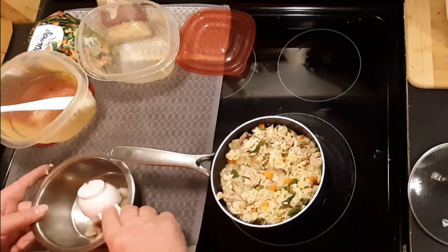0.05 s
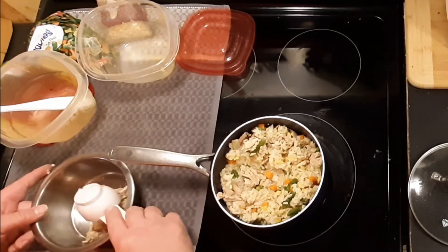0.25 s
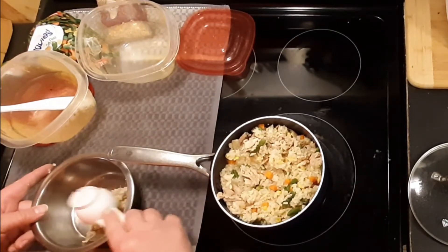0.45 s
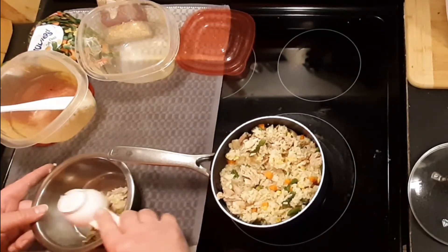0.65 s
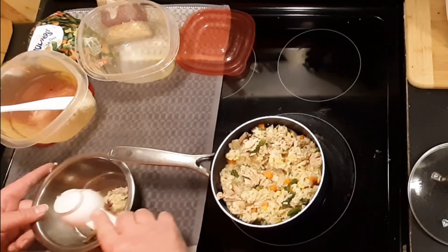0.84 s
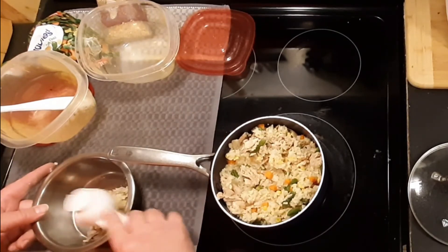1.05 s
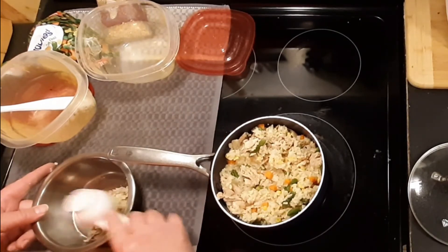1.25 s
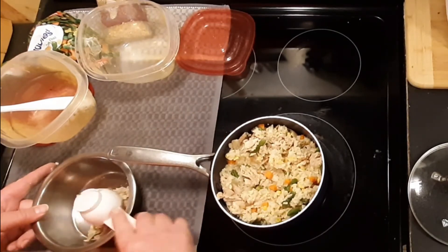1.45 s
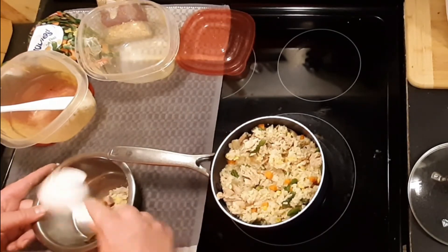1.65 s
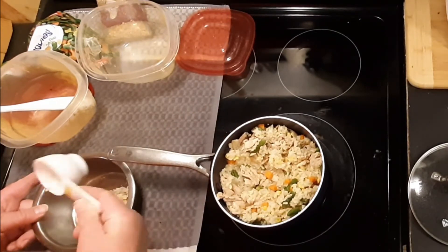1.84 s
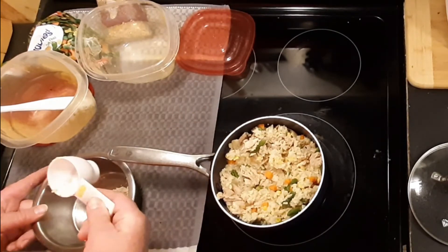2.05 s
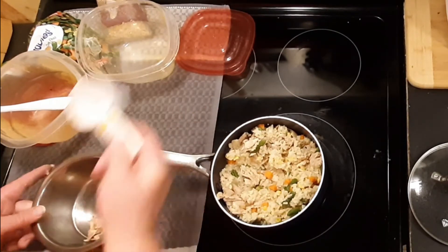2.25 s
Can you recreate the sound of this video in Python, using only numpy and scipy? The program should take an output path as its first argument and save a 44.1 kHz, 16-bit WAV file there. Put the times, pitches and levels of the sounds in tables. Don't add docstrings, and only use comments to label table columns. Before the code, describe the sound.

Close microphone in a small, hard-walled kitchen: nine steady metallic raps of a plastic scoop on a pan, the first soft and the last loudest, faint food patter and low drone between, finally a scraping rub on a plastic tub.

```python
import sys
import numpy as np
from scipy import signal
from scipy.fft import rfft, irfft, next_fast_len
from scipy.io import wavfile
from scipy.ndimage import uniform_filter1d, map_coordinates

SR = 44100
rng = np.random.default_rng(int(sys.argv[2]) if len(sys.argv) > 2 else 0)


def transcribe(signal):
    frames = np.atleast_2d(signal).T
    limited = np.clip(frames, -1, 1)
    pcm = np.round(limited * 32767).astype(np.int16)
    wavfile.write(sys.argv[1], SR, pcm)


def boost(x):
    u = np.asarray(x, float) / 20
    return 10 ** u


N = 101429


def unit(x):
    return x / np.sqrt(np.mean(x ** 2) + 1e-20)


def along(points, hz):
    f, v = np.transpose(points)
    return np.interp(np.log(hz + 1), np.log(f + 1), v)


def curve(rows):
    s, db = np.transpose(rows)
    return boost(np.interp(np.arange(N) / SR, s, db))


def filtered(x, response):
    m = next_fast_len(len(x) + 8192)
    return irfft(rfft(x, m) * response(np.fft.rfftfreq(m, 1 / SR)), m)[:len(x)]


def hiss(spectrum, size):
    return unit(filtered(rng.standard_normal(size), lambda hz: boost(along(spectrum, hz))))


def wobble(rate):
    knots = rng.standard_normal(int(N * rate / SR) + 4)
    return map_coordinates(knots, [np.arange(N) * rate / SR])


def ring(t, hz, db, t60, rise):
    decay = boost(db[:, None] - 60 * t / t60[:, None])
    modes = decay * np.sin(2 * np.pi * hz[:, None] * t)
    return modes.sum(0) * (1 - np.exp(-(t / rise) ** 2))


def add(track, x, s):
    part = track[max(round(s * SR), 0):][:len(x)]
    part += x[:len(part)]


# start_s, level_db, pitch_hz (cup note), rim_level_db, note_level_db
TAPS = [
    (0.0582, -17, 833, -14, -5),
    (0.2186, -5, 952, -8, -2.5),
    (0.3886, -5, 878, -8, 3),
    (0.5543, -2.5, 812, -6.5, 0.9),
    (0.729, -4.5, 850, -3, 2.7),
    (0.9122, -2.2, 884, -4, 1.6),
    (1.0854, -0.47, 982, -9, 3.1),
    (1.2770, -3.5, 850, -5.5, 3.5),
    (1.4517, 0.7, 908, -10, 1.84),
]
# frequency_hz, level_db (per Hz)
WASH = [(300, -22), (1200, -4), (2600, -11.5), (3500, -16), (5200, 1), (6900, -6.5), (9300, -3),
        (16000, -30)]
WALLS_DB, WALLS_DELAY_S, WASH_DB = -3.5, 0.003, 23
MIC_LOW_HZ = 430


def taps():
    out, t = np.zeros(N), np.arange(SR // 4) / SR
    for s, db, note_hz, rim_db, note_db in TAPS:
        near, far = pan(t, note_hz, rim_db, note_db)
        near = filtered(near, lambda f: (1j * f / (MIC_LOW_HZ + 1j * f)) ** 2)
        direct = near + crack(t, rim_db) + worktop(t)
        wash = boost(WASH_DB + rim_db) * filtered(walls(), lambda hz: boost(along(WASH, hz)))
        echo = boost(WALLS_DB) * signal.fftconvolve(far, walls())
        gain = boost(db - 10)
        add(out, gain * direct, s)
        add(out, gain * wash, s + WALLS_DELAY_S)
        add(out, gain * echo, s + WALLS_DELAY_S)
    return out


# frequency_hz, level_db, t60_s
CUP = [(562.7, -1.5, 0.042), (614, -13, 0.016), (837, -3.5, 0.038), (918, -10, 0.032), (1158, -1.5, 0.016),
       (1347.5, -2, 0.049), (1590, -0.5, 0.063), (1767.6, -1.5, 0.054), (2049, -7.5, 0.048),
       (2264, -12.5, 0.054), (2536, -6.5, 0.034), (2670, -10.5, 0.031)]
# frequency_hz, level_db, t60_s
RIM = [(4320, -8, 0.046), (4660, -6, 0.085), (4770, -5.5, 0.055), (5730, -6.5, 0.099), (6320, -12, .03),
       (7265, -8, 0.09), (8010, 2, 0.056), (8090, -7.5, 0.0067), (8500, 9, 0.011), (9485, -4.5, .03),
       (9635, -5, 0.047), (9970, 2.5, 0.024), (10800, -27, .03), (10840, -14.5, 0.027)]
NOTE_DB, NOTE_T60_S = 6, 0.03
CUP_RISE_S, RIM_RISE_S, RIM_T60_MAX_S = 0.00045, 0.00083, 0.035
SCATTER_DB = 1.2
FAR_SHORTER = 0.38


def pan(t, note_hz, rim_db, note_db):
    cup_hz, cup_db, cup_t60 = np.transpose(CUP)
    rim_hz, rim_mode_db, rim_t60 = np.transpose(RIM)
    cup_db = cup_db + SCATTER_DB * rng.standard_normal(len(cup_hz))
    cup_db = np.append(cup_db, NOTE_DB + note_db)
    cup_hz, cup_t60 = np.append(cup_hz, note_hz), np.append(cup_t60, NOTE_T60_S)
    rim_mode_db = rim_mode_db + rim_db + SCATTER_DB * rng.standard_normal(len(rim_hz))
    rim_t60 = np.minimum(rim_t60, RIM_T60_MAX_S)
    rings = []
    for k in (1, FAR_SHORTER):
        rim = ring(t, rim_hz, rim_mode_db, rim_t60 * k, RIM_RISE_S)
        cup = ring(t, cup_hz, cup_db, cup_t60 * k, CUP_RISE_S)
        rings.append(rim - cup)
    return rings


# frequency_hz, level_db (per Hz)
CRACK = [(300, -41.5), (2500, -10.5), (3500, -14.5), (5500, 5.5), (7000, -1), (9000, -1.5), (11500, -9.5),
         (16000, -17.5)]
CRACK_DB, CRACK_T60_S = -1.6, 0.038


def crack(t, rim_db):
    decay = boost(CRACK_DB + rim_db - 60 * t / CRACK_T60_S)
    return decay * hiss(CRACK, size=len(t)) * (1 - np.exp(-t / RIM_RISE_S))


# frequency_hz, level_db, t60_s
WORKTOP = [(165.1, -5.5, 0.07), (187.7, -20.5, 0.26), (257.6, -23, 0.29), (291, -29, .2),
           (356.5, -35, 0.04)]
WORKTOP_RISE_S, WORKTOP_DRIFT = 0.011, 0.03


def worktop(t):
    hz, db, t60 = np.transpose(WORKTOP)
    drift = 1 + WORKTOP_DRIFT * rng.standard_normal(len(hz))
    return ring(t, hz * drift, db, t60, WORKTOP_RISE_S)


# frequency_hz, t60_s
WALLS = [(100, 1), (260, 0.11), (700, 0.36), (1840, 0.37), (4850, 0.35), (9000, 0.26), (14000, 0.24)]
WALLS_RISE_S = 0.0027


def walls():
    hz, t, z = signal.stft(rng.standard_normal(SR // 2), SR, nperseg=256)
    decay = boost(-60 * t / along(WALLS, hz)[:, None])
    tail = signal.istft(z * decay, SR, nperseg=256)[1]
    tail = tail * (1 - np.exp(-np.arange(len(tail)) / SR / WALLS_RISE_S))
    return tail / np.linalg.norm(tail)


# start_s, level_db, t60_s
TINKS = [
    (.1391, -75, 0.018),
    (1.661, -70.5, 0.46),
    (1.692, -70, 0.18),
    (1.937, -84, .25),
]
# frequency_hz, level_db
TINK = [(3310, -10), (6085, 1.5), (6955, 1.5), (7705, -5), (9505, 4), (10510, -11)]


def tinks():
    out, t = np.zeros(N), np.arange(SR // 4) / SR
    hz, level = np.transpose(TINK)
    for s, db, t60 in TINKS:
        noise = rng.standard_normal((len(hz), len(t)))
        shake = signal.hilbert(uniform_filter1d(noise, size=100, axis=1))
        waver = 1 + unit(shake.real) + 1j * unit(shake.imag)
        gains = boost(level + rng.standard_normal(len(hz)))[:, None]
        modes = gains * np.real(waver * np.exp(2j * np.pi * hz[:, None] * t))
        add(out, boost(db - 60 * t / t60) * modes.sum(0), s)
    return out


# start_s, level_db
TICKS = [
    (.1828, -36),
    (.264, -36),
    (1.697, -54),
    (1.715, -57),
]


def ticks():
    out, t = np.zeros(N), np.arange(SR // 4) / SR
    for s, db in TICKS:
        decay = boost(db - 60 * t / 0.003)
        add(out, decay * hiss(CRACK, size=len(t)), s)
    return out


GRAINS_PER_S, GRAIN_SPREAD_DB = 1200, 2.5


def grainy():
    hits = rng.random(N) < GRAINS_PER_S / SR
    sizes = boost(GRAIN_SPREAD_DB * rng.exponential(size=N))
    grains = hits * sizes * rng.standard_normal(N)
    return unit(grains) * 0.6 + rng.standard_normal(N)


# time_s, level_db
SLIDE = [(0, -47.5), (.12, -60), (.14, -48.5), (.21, -54.5), (.255, -50), (.275, -37.5), (.33, -48),
         (.38, -51), (.46, -43), (.54, -49), (.7, -57.5), (1.6, -74.5), (1.72, -66), (1.9, -71.5),
         (2.08, -73.5), (2.16, -67), (2.2, -68.5), (2.3, -66)]
# frequency_hz, level_db (per Hz)
FOOD = [(880, -27), (1500, -8.5), (2230, -4), (2510, -9.5), (4330, -4.5), (7320, -11.5), (11000, -24.5),
        (16000, -42)]


def food():
    sway = boost(1.5 * wobble(30))
    return curve(SLIDE) * sway * unit(filtered(grainy(), lambda hz: boost(along(FOOD, hz))))


# time_s, level_db
BRUSH = [(2.15, -100), (2.22, -72), (2.25, -62), (2.278, -47.5), (2.3, -41)]
# frequency_hz, width_hz, level_db
TUB = [(750, 180, -1.5), (2420, 900, -12), (4200, 1200, -8), (6800, 450, -1.5), (8240, 600, -7.5),
       (10500, 2100, -14.5)]
TUB_WIDTH_MIN_HZ, TUB_TOP_HZ = 500, 11500


def tub_response(f):
    body = 0
    for k, (centre, width, db) in enumerate(TUB):
        width = max(width, min(TUB_WIDTH_MIN_HZ, centre / 3))
        mode = 1j * f * width / (centre * centre - f * f + 1j * f * width)
        body = body + (-1) ** k * boost(db) * mode
    return body / (1 + (f / TUB_TOP_HZ) ** 6)


def brush():
    sway = boost(1.5 * wobble(150))
    return curve(BRUSH) * sway * unit(filtered(grainy(), tub_response))


# time_s, level_db
HUM = [(0, -75), (.06, -43), (.28, -56), (.31, -41), (.5, -50.5), (.63, -41.5), (.7, -55), (.81, -38),
       (1.06, -52), (1.16, -40), (1.29, -49), (1.35, -36), (1.46, -52), (1.52, -38.5), (1.62, -43),
       (1.66, -58), (1.8, -50), (1.85, -67)]
HUM_PITCH_HZ, HUM_WANDER = 62.9, 0.065


def hum():
    hz = HUM_PITCH_HZ * (1 + HUM_WANDER * wobble(25))
    return np.sqrt(2) * curve(HUM) * np.sin(2 * np.pi * np.cumsum(hz) / SR)


# frequency_hz, level_db (per Hz)
AIR = [(15, -54), (25, -17), (60, 1.5), (118, -5), (330, -7.5), (1780, -25), (2400, -45), (7710, -39.5),
       (16500, -42.5)]
# time_s, gain_db
GATE = [(0, 15), (.3, 7), (1.62, 9.5), (1.65, 9), (1.8, 5), (1.83, 4.4), (2.3, 5)]
AIR_DB, AIR_SWAY_DB = -60, 1.2


def air():
    return boost(AIR_DB + AIR_SWAY_DB * wobble(11)) * curve(GATE) * hiss(AIR, size=N)


def scene():
    return (taps() + tinks() + ticks() + food() + brush() + hum() + air())[None]


def top_cut(x):
    return signal.sosfilt(signal.butter(12, 16820, fs=SR, output="sos"), x)


def record(dry):
    soft = dry[0] / (1 + np.abs(dry[0] / 1.6) ** 6) ** (1 / 6)
    mix = filtered(soft, lambda hz: 1 / (1 + (hz / 16300) ** 60))[None]
    return top_cut(mix)


dry = scene()
out = record(dry)
transcribe(out)
```